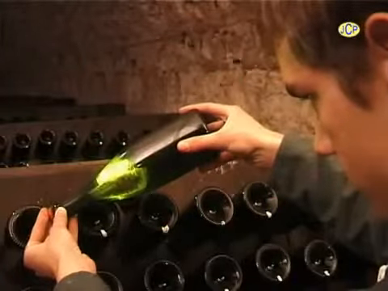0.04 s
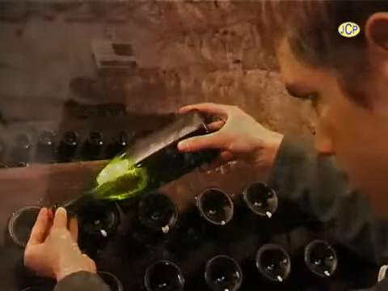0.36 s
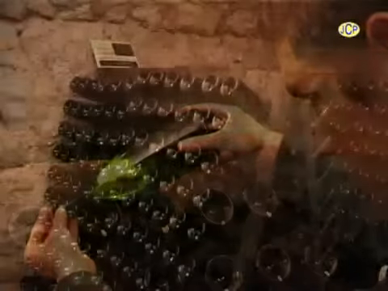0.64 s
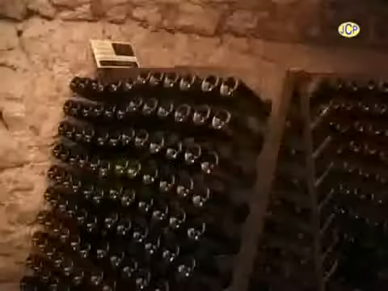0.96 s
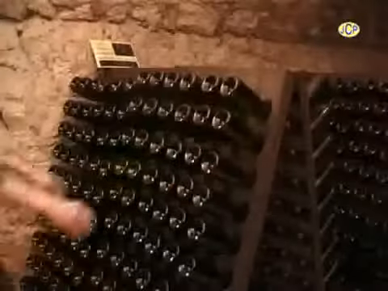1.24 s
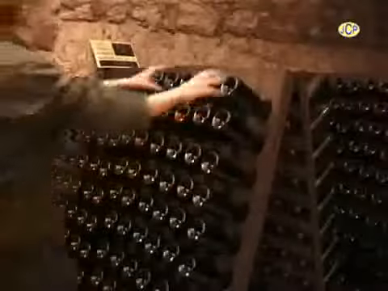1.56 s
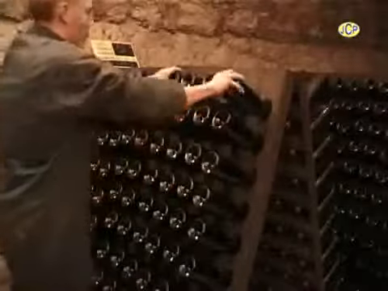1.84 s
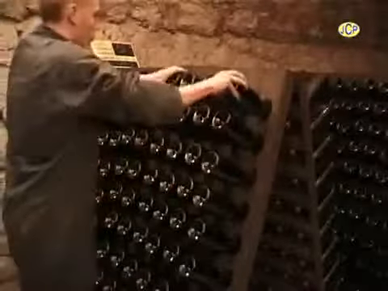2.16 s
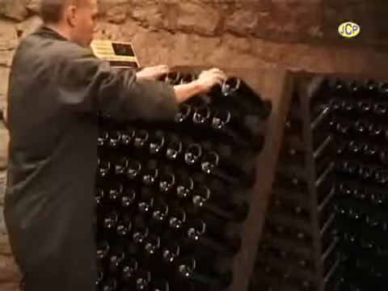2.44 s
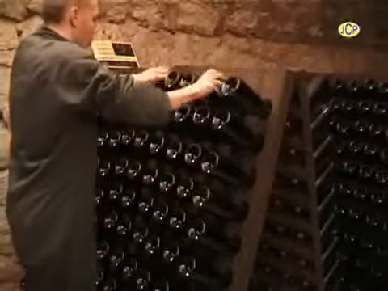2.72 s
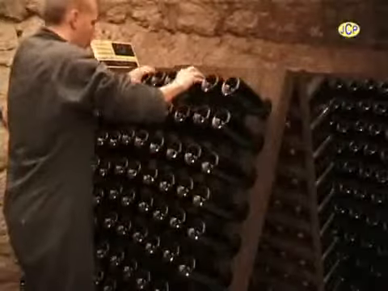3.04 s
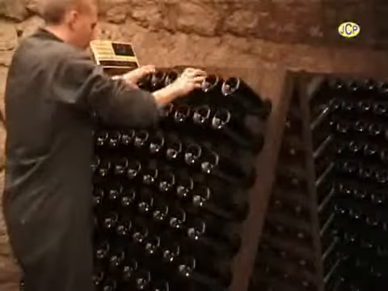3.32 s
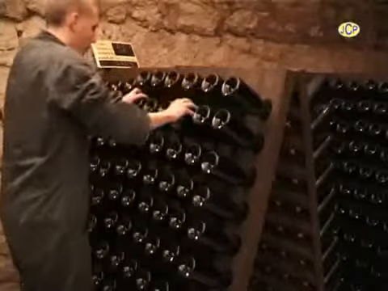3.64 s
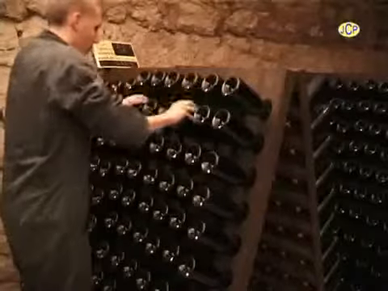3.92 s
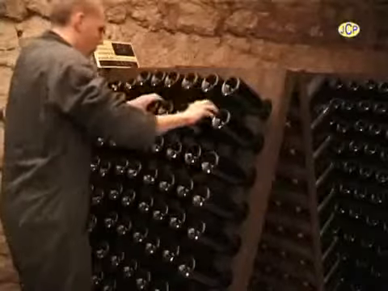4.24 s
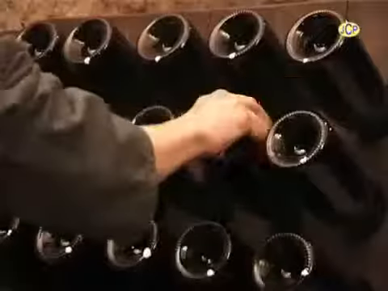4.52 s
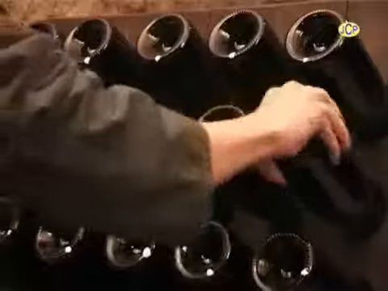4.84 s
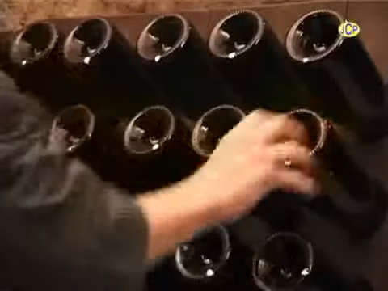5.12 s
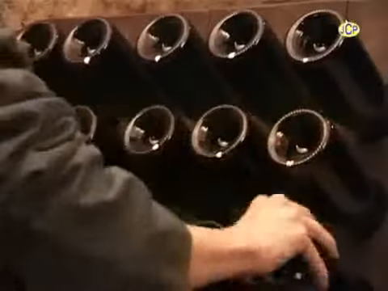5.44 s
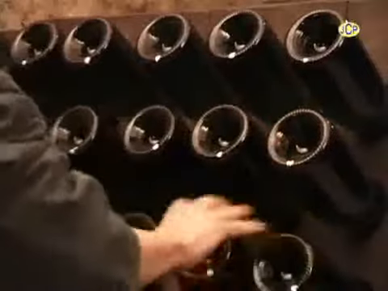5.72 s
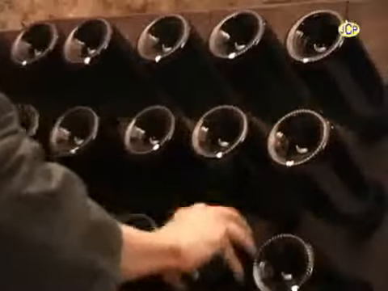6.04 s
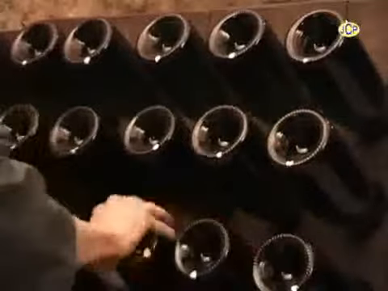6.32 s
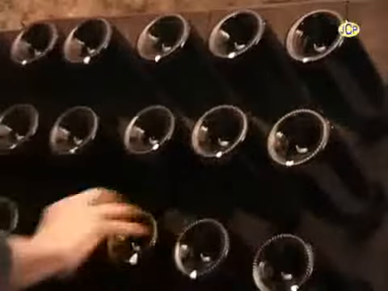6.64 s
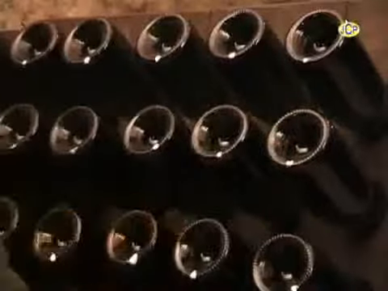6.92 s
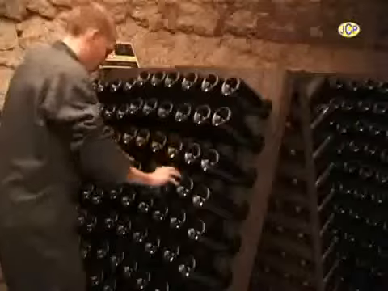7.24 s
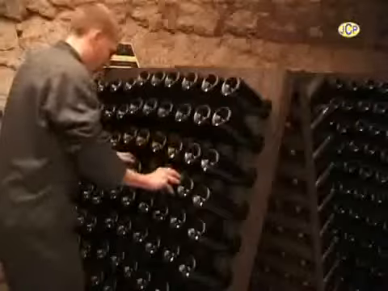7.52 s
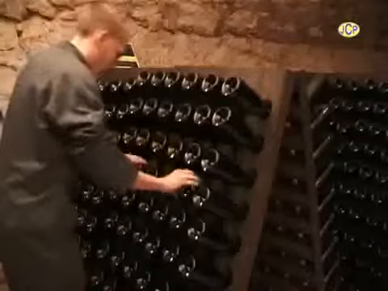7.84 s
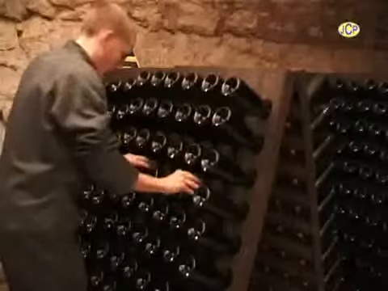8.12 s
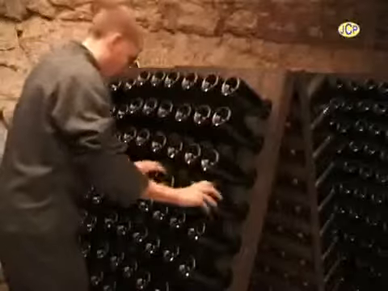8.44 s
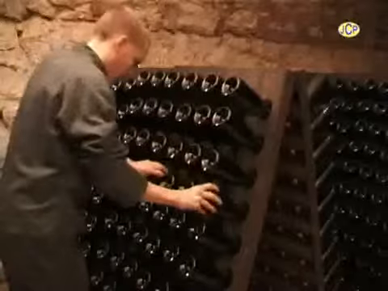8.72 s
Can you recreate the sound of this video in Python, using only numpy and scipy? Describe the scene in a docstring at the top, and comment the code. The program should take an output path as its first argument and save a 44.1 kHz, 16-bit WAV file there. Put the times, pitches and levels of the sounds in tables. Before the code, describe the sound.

It opens very quietly, with faint taps and squeaks of glass on wood over still cellar air. Around 1 second everything dips briefly to near silence. At about 1.5 seconds a coat rustles and light knocks begin, followed by a first modest clack at 2.2 seconds. From 2.8 seconds to the end, near 9 seconds, glass bottles are turned and dropped back into a wooden rack, landing loudly about every 0.6 seconds. Each landing is a quick cluster of touch, blow and rebound: a hollow knock, a wooden clack and a short glassy crack. The strongest come between about 6.4 and 8.2 seconds. Lighter nudges, soft grinding and cloth rustle fill the gaps, with faint high squeaks or rings near 3.6, 5.9 and 7.7 seconds. The impacts sound fairly close, and the stone vault adds a short reverberation with a lingering low boom.

```python
"""Faint squeaks and taps over still cellar air come first, cut by a brief dip to near silence. Then a worker
turns glass bottles, two at a time, in sloping wooden racks. Each bottle is gripped, squeaks or knocks in
its hole, and drops back in a quick cluster of impacts that excite damped modes: a hollow knock, a wooden
clack, a glassy crack. Some ring on briefly. His coat rustles; the stone vault rings and booms."""
import sys
import numpy as np
from scipy import signal
from scipy.fft import rfft, irfft, next_fast_len
from scipy.io import wavfile
from scipy.ndimage import uniform_filter1d

SR = 44100
rng = np.random.default_rng(int(sys.argv[2]) if len(sys.argv) > 2 else 0)


def dump_mix(stems):
    """Bounce the given channels to the path in sys.argv[1] as a 16-bit WAV at rate SR."""
    frames = np.atleast_2d(stems).T  # one column per channel
    limited = np.clip(frames, -1, 1)  # hard clip at full scale
    pcm = np.round(limited * 32767).astype(np.int16)
    wavfile.write(sys.argv[1], SR, pcm)


N = 387198

# Levels in the tables are relative.
# A turned bottle drops home, touching the rim first and rebounding once: (time [s], knock level [dB],
# knock pitch [Hz], clack level [dB], clack pitch [Hz], crack level [dB], touch lead [s], touch level [dB],
# rebound delay [s], rebound knock change [dB], rebound clack and crack change [dB], thump level [dB])
BOTTLE_DROPS = [(2.182, -22, 470, -14, 1180, -52, .005, -38, 0.014, -7, -1.5, -30),
                (2.826, -3.5, 529, -13.5, 880, -20, 0.042, -1, .010, 3, 0.5, -14.5),
                (3.375, -3, 653, -9.5, 1155, -17, .006, -2.5, 0.08, -12, -27, -14),
                (4.014, -4, 493, -6.5, 960, -21.5, 0.027, -3, .015, -3.5, -4.5, -17),
                (4.585, -1, 531, -13.5, 1900, -38, 0.04, -21.5, .044, -8.5, -7, -26),
                (5.151, -1.5, 479, -21.5, 890, -42.5, 0.0052, -19, 0.024, -22, -3.5, -35),
                (5.820, -5.5, 614, -9.5, 1100, -20, 0.019, -5, 0.0097, 0, -13.5, -19),
                (6.396, 1, 537, -6.5, 1250, -21, 0.015, 3.5, .022, -4.5, -13, -26),
                (6.966, 1, 616, -7.5, 990, -17, .037, -4, .030, -15, -13, -20),
                (7.592, -4, 471, -5.5, 1040, -20.5, 0.008, -9.5, .030, -23, 1, -27),
                (8.193, 3, 620, -7, 985, -17, 0.01, -9.5, 0.029, 0, 1, -26.5),
                (8.775, 0, 488, -16.5, 1014, -28, 0.0036, -28, .030, -6, -6, -19)]
# Fingers nudge a bottle against its hole:
# (time [s], knock level [dB], knock pitch [Hz], clack level [dB], clack pitch [Hz], crack level [dB])
BOTTLE_NUDGES = [(0.147, -42, 554, -46.5, 1700, -69), (0.599, -44, 665, -43.5, 920, -69),
                 (0.834, -50, 494, -43.5, 1070, -69), (1.527, -22, 367, -52, 1050, -54),
                 (1.583, -20.5, 364, -41, 1720, -55), (1.984, -45, 500, -33, 1870, -38),
                 (1.999, -21.5, 517, -27, 1920, -42), (2.632, -32, 500, -37, 2190, -59),
                 (2.674, -21.5, 504, -39.5, 1340, -60), (2.752, -11, 546, -30, 980, -57),
                 (2.773, 2, 530, -38, 1120, -54), (2.981, -15, 379, -44, 902, -51),
                 (3.093, -23, 557, -34, 1900, -42), (3.524, -16, 504, -38, 1080, -48),
                 (3.802, -19.5, 585, -28.5, 2200, -41), (3.826, -6.5, 454, -49, 1164, -63),
                 (3.857, -15, 548, -35, 1140, -66), (3.906, -10, 565, -28, 1090, -57),
                 (4.398, -25, 474, -30, 1900, -32.5), (4.413, -6.5, 437, -19.5, 1810, -28.5),
                 (4.709, -17, 495, -38, 1030, -45), (4.981, -16.5, 453, -19.5, 1080, -23.5),
                 (5.023, -11, 457, -25, 930, -60), (5.28, -45, 463, -36, 1990, -46),
                 (5.381, -36, 363, -49, 1920, -40), (5.602, -25.5, 574, -31, 2340, -42),
                 (5.751, -7.5, 519, -36.5, 950, -47), (6.186, -19, 430, -30, 1270, -46),
                 (6.239, -14, 457, -39, 1090, -61), (6.359, -19, 495, -37, 1220, -54),
                 (6.694, -39, 463, -29, 1630, -38), (6.738, -19.5, 532, -28, 1030, -47),
                 (6.84, -12, 529, -50, 1080, -66), (7.418, -16.5, 511, -28.5, 2070, -28),
                 (8.014, -8, 515, -22.5, 1210, -51), (8.511, -35, 410, -30, 1520, -50),
                 (8.629, -19, 516, -25.5, 2480, -39)]
# Glass squeaks or groans on wood, or a bottle rings on briefly:
# (time [s], duration [s], pitch [Hz], half bandwidth [Hz], level [dB])
SQUEAKS_AND_RINGS = [(0.321, 0.097, 272, 100, -50), (0.439, 0.093, 2420, 70, -55),
                     (0.81, 0.1, 2440, 110, -56), (1.507, 0.095, 708, 20, -40.5),
                     (1.595, 0.22, 306, 66, -45.5), (2.47, 0.1, 2700, 83, -53.5),
                     (2.618, 0.11, 2940, 180, -51), (2.988, 0.1, 3400, 280, -46.5),
                     (3.639, 0.036, 3460, 540, -38), (5.934, 0.039, 2680, 120, -39),
                     (5.961, 0.12, 2670, 32, -54.5), (6.803, 0.068, 4720, 21, -54),
                     (6.816, 0.052, 2730, 60, -50), (7.721, 0.17, 2662, 49, -41),
                     (8.008, 0.096, 3000, 27, -49)]
# Normal modes: (frequency [Hz], level [dB], decay time T60 [s])
LOADED_RACK_MODES = [(172.7, -15.5, 0.21), (412, 5.5, 0.13), (550, -14, 0.29), (590, 16.5, 0.014),
                     (746, -25, 0.17), (960, -11, 0.12), (1260, -23, 0.24), (1441, 2.5, 0.085),
                     (1580, 9, 0.046), (1940, 6, 0.026), (1997, 3.5, 0.13)]
FULL_BOTTLE_MODES = [(2740, -1, 0.11), (3620, -40, 0.057), (4590, -4, 0.063), (4695, 20.5, 0.049),
                     (6030, -1, 0.1), (6970, 0, 0.044), (6740, -17, 0.25)]
RACK_FLEXING_MODES = [(172.6, -3.5, 0.15), (313, 0.5, 0.12)]
# Spectra of the impacts and the background noises: (frequency [Hz], spectral density level [dB])
WOOD_SPECTRUM = [(60, -43.5), (170, -13.5), (260, -14.5), (400, 4), (700, 2), (1100, -2.5), (1800, -4),
                 (2600, -13), (4000, -20.5), (8000, -33.5), (13000, -79)]
GLASS_SPECTRUM = [(900, -2.5), (2200, 4), (3300, 2.5), (4800, -2), (6500, -2.5), (8200, -7), (9700, -7.5),
                  (10800, -24.5), (13000, -24)]
RUMBLE_SPECTRUM = [(25, -46), (50, -17), (85, 1), (105, -9), (135, 7.5), (175, 2), (230, -5.5), (320, -2.5),
                   (600, -40.5), (5000, -88)]
GRINDING_SPECTRUM = [(150, -15), (270, -2), (360, 1.5), (440, 4), (560, -3.5), (700, -5.5), (1100, -12.5),
                     (2500, -19.5), (12000, -69)]
COAT_SPECTRUM = [(300, 4.5), (700, 4.5), (1800, 2.5), (3000, -3), (5000, -6), (7500, -11.5), (9800, -17),
                 (11000, -31), (14000, -42)]
AIR_SPECTRUM = [(50, -27), (90, 7.5), (120, -1.5), (400, -3), (900, -3.5), (1020, 4.5), (1150, -5.5),
                (2250, -9.5), (2520, -8), (2850, -13.5), (6500, -18), (10000, -22.5), (12000, -57)]
# Rumble of the rack between drops: (time [s], level [dB])
RUMBLE_ENVELOPE = [(0, -67), (.9, -67), (1.6, -49), (2.25, -48.5), (2.6, -55.5), (3.7, -38.5), (4.3, -41.5),
                   (4.9, -50.5), (6.2, -51), (7.5, -50), (8.1, -51), (8.5, -32.5), (8.78, -40)]
# Coat rustle as the worker steps up, then keeps moving his arms: (time [s], level [dB])
COAT_ENVELOPE = [(0, -72), (1.2, -62.5), (1.42, -50), (1.53, -38.5), (1.8, -42.5), (1.92, -48),
                 (2.06, -43.5), (2.35, -45.5), (2.7, -42.5), (5.5, -49), (6.7, -47.5), (7.4, -47.5),
                 (8.3, -47), (8.78, -35.5)]
# Reverberation time of the vault: (frequency [Hz], decay time T60 [s])
VAULT_DECAY = [(100, 1.76), (260, 0.5), (550, 0.47), (1000, 0.47), (2000, 0.4), (5000, 0.42), (10000, 0.14)]
# Reverberant field of the vault: (frequency [Hz], level [dB])
VAULT_GAIN = [(100, -2.5), (260, -4), (550, -5), (1000, -5), (2000, -4), (5000, -4.5), (10000, -4.5)]

TOUCH_WOOD_DB, TOUCH_GLASS_DB, TOUCH_HZ = -20.5, -34, 541.5   # dull first touch: levels re its knock
REBOUND_PITCH_RATIO = .88   # the seated bottle knocks lower
HARD_RISE_S, SOFTENING_POWER = 0.00064, 0.46   # onset of a 0 dB blow; weaker blows build more slowly
STRETCH_POWER = 0.16   # a light knock is half a rub, so it lasts longer


def bottles():
    """Impact excitation: each contact sets the hollow seat, the wooden board and the glass vibrating."""
    t = np.arange(SR // 6) / SR
    tones, clacks, cracks = np.zeros((3, N))
    for s, knock_db, knock_hz, wood_db, wood_hz, glass_db in contacts():
        onset = 1 - np.exp(-t / (HARD_RISE_S * amp(-SOFTENING_POWER * wood_db)))
        wood = onset * amp(wood_db + 28.5)   # the offsets turn a level into the energy of one blow
        glass = onset * amp(glass_db + 29.5)
        stretch = amp(-STRETCH_POWER * wood_db)
        hollow = knock(t, knock_hz, t60=0.055 * stretch, rise_s=0.0025 * stretch, rattle_db=-2)
        add(tones, s, onset * amp(knock_db + 3) / np.sqrt(stretch) * hollow)
        # the place struck favours one pitch
        add(tones, s, wood * amp(-7.5) * clatter(t, wood_hz, t60=0.071, width=0.17))
        add(tones, s, wood * amp(-9) * ringing(t, LOADED_RACK_MODES, detune=0.0052))
        add(tones, s, glass * amp(-10) * ringing(t, FULL_BOTTLE_MODES, detune=0.021))
        # wood gives a slow crash, glass a hard short one
        add(clacks, s, wood * impact(t, rise_s=.018, crash_t60=.06, chatter_db=-12, snap_db=-12))
        add(cracks, s, glass * impact(t, rise_s=.008, crash_t60=.03, chatter_db=-17, snap_db=-5))
    return tones + colour_same_power(clacks, WOOD_SPECTRUM) + colour_same_power(cracks, GLASS_SPECTRUM)


def contacts():
    """Collision and rebound: a nudge is one contact; a drop is a touch, a blow and a bounce."""
    rows = list(BOTTLE_NUDGES)
    for drop in BOTTLE_DROPS:
        s, knock_db, knock_hz, wood_db, wood_hz, glass_db = drop[:6]
        lead_s, touch_db, delay_s, knock_change_db, clack_change_db = drop[6:11]
        touch = (s - lead_s, touch_db, TOUCH_HZ,
                 touch_db + TOUCH_WOOD_DB, wood_hz, touch_db + TOUCH_GLASS_DB)
        blow = (s, knock_db, knock_hz, wood_db, wood_hz, glass_db)
        rebound = (s + delay_s, knock_db + knock_change_db, knock_hz * REBOUND_PITCH_RATIO,
                   wood_db + clack_change_db, wood_hz, glass_db + clack_change_db)
        rows += [touch, blow, rebound]
    return rows


def knock(t, hz, t60, rise_s, rattle_db):
    """Damped oscillation: the bottle's mass bounces on the board; neighbours rattle near its pitch."""
    bounce = np.sin(2 * np.pi * hz * t) * decay(t, t60) * (1 - np.exp(-t / rise_s))
    rattle = clatter(t, hz, t60=.14, width=.24)
    return bounce + amp(rattle_db) * np.linalg.norm(bounce) * rattle


def clatter(t, hz, t60, width):
    """Modal overlap: close resonances around one pitch merge into a decaying band of noise."""
    burst = rng.standard_normal(len(t)) * decay(t, t60)
    return unit_energy(band(burst, hz / (1 + width), hz * (1 + width)))


def ringing(t, modes, detune):
    """Modal superposition: each bottle and seat is tuned differently; each blow excites modes unevenly."""
    hz, db, t60 = np.transpose(modes)
    level_scatter, pitch_scatter, polarity = rng.standard_normal((3, len(hz)))
    strength = amp(db + 3 * level_scatter) * np.sign(polarity)
    tuned_hz = hz * (1 + detune * pitch_scatter)
    waves = np.sin(2 * np.pi * tuned_hz[:, None] * t) * decay(t, t60[:, None])
    return unit_energy(strength @ waves)


def impact(t, rise_s, crash_t60, chatter_db, snap_db):
    """Broadband transient: a snap, a crash of tiny collisions, then weaker chatter through the rack."""
    snap = amp(snap_db) * decay(t, t60=.006)
    chatter = amp(chatter_db) * decay(t, t60=.2)
    crash = (1 - decay(t, rise_s)) * (decay(t, crash_t60) + chatter)
    return unit_energy(rng.standard_normal(len(t)) * (crash + snap))


def slides(re_touch_db):
    """Sliding friction: glass scrapes on wood from the first touch until the bottle lands."""
    pressure = np.zeros(N)
    for s, _, _, _, _, _, lead_s, touch_db, *_ in BOTTLE_DROPS:
        size = max(int(lead_s * SR), 1)
        add(pressure, s - lead_s, np.full(size, amp(touch_db + re_touch_db)))
    return uniform_filter1d(pressure, size=256) * noise(WOOD_SPECTRUM, flutter_db=4, flutter_hz=260)


def thumps():
    """Free vibration: the whole rack gives under each landing bottle and sounds its lowest modes."""
    t, out = np.arange(SR // 3) / SR, np.zeros(N)
    for s, *_, thump_db in BOTTLE_DROPS:
        for hz, db, t60 in RACK_FLEXING_MODES:
            mode = clatter(t, hz, t60, width=.16)
            add(out, s, amp(thump_db + db) * mode / np.abs(mode).max())
    return out


def squeaks_and_rings(rasp_db, rasp_width):
    """Resonance: a narrow band sings inside a broader rasp as glass rubs on wood or a bottle rings on."""
    out = np.zeros(N)
    for s, duration_s, hz, half_width_hz, db in SQUEAKS_AND_RINGS:
        size = int(duration_s * SR)
        drive = rng.standard_normal(SR // 3)
        tone = unit_energy(band(drive, hz - half_width_hz, hz + half_width_hz)[-size:])
        rasp = unit_energy(band(drive, hz / (1 + rasp_width), hz * (1 + rasp_width))[-size:])
        note = (tone + amp(rasp_db) * rasp) * signal.windows.tukey(size)
        add(out, s, amp(db) * np.sqrt(size) * unit_energy(note))
    return out


def vault(x, build_s):
    """Reverberation: reflections from stone form a dense tail that lasts longest in the bass."""
    t = np.arange(3 * SR // 2) / SR
    edges_hz = np.geomspace(50, 14000, num=15)
    build_up = 1 - np.exp(-t / build_s)
    response = 0
    for low, high in zip(edges_hz, edges_hz[1:]):
        hz = np.sqrt(low * high)
        tail = band(rng.standard_normal(len(t)), low, high) * decay(t, at_hz(VAULT_DECAY, hz)) * build_up
        band_share = 2 * (high - low) / SR
        response += amp(at_hz(VAULT_GAIN, hz)) * np.sqrt(band_share) * unit_energy(tail)
    return signal.fftconvolve(x, response)[:N]


def rack_rumble():
    """Structure-borne sound: the rack rumbles, and shudders after each drop; the two add in power."""
    shudder = amp(-31) * after_drops(rise_s=.004, t60=0.55)
    envelope = np.hypot(gain_curve(RUMBLE_ENVELOPE), shudder)
    return envelope * noise(RUMBLE_SPECTRUM, flutter_db=2.5, flutter_hz=42)


def grinding(start_s, ramp_s):
    """Friction noise: handled bottles grind hollowly in their holes, and grind to rest after a drop."""
    handling = amp(-44) * np.clip((np.arange(N) / SR - start_s) / ramp_s, 0, 1)
    settling = amp(-25) * after_drops(rise_s=0.071, t60=0.88)
    return np.hypot(handling, settling) * noise(GRINDING_SPECTRUM, flutter_db=3.5, flutter_hz=45)


def coat_rustle():
    """Friction of cloth: broadband noise that follows the worker's movements."""
    return amp(-1.5) * gain_curve(COAT_ENVELOPE) * noise(COAT_SPECTRUM, flutter_db=1, flutter_hz=120)


def cellar_air():
    """Ambient noise: the air of the cellar sets a nearly steady floor."""
    return amp(-53.5) * noise(AIR_SPECTRUM, flutter_db=1.2, flutter_hz=12)


def level_dip(from_s, to_s, fall_s, rise_s):
    """Amplitude envelope: the whole sound sinks, is almost silent for a moment and returns."""
    t = np.arange(N) / SR
    presence = np.maximum((from_s - t) / fall_s, (t - to_s) / rise_s)
    gate = uniform_filter1d((presence > 0) * 1.0, size=512)
    fade_db = -13.5 * (1 - np.clip(presence, 0, 1))
    return np.maximum(gate, amp(-30)) * amp(fade_db)


def after_drops(rise_s, t60):
    """Linear response: an envelope swells and decays after each drop, in proportion to its knock."""
    t, envelope = np.arange(2 * SR) / SR, np.zeros(N)
    for s, knock_db, *_ in BOTTLE_DROPS:
        add(envelope, s, amp(knock_db) * (1 - np.exp(-t / rise_s)) * decay(t, t60))
    return envelope


def noise(spectrum, flutter_db, flutter_hz):
    """Random amplitude modulation: coloured noise of rms 1 whose level flutters."""
    steps = np.arange(N) / SR * flutter_hz
    white = rng.standard_normal(N)
    flutter = np.interp(steps, np.arange(4096), rng.standard_normal(4096))
    return np.sqrt(N) * unit_energy(colour(white * amp(flutter_db * flutter), spectrum))


def colour(x, spectrum):
    """Minimum-phase filtering: folding the cepstrum gives a causal filter with this spectrum."""
    size = 2 * next_fast_len(len(x))
    hz = np.arange(size // 2 + 1) * SR / size
    cepstrum = irfft(np.log(amp(at_hz(spectrum, hz))))
    cepstrum[1:size // 2] *= 2
    cepstrum[size // 2 + 1:] = 0
    return irfft(rfft(x, size) * np.exp(rfft(cepstrum)))[:len(x)]


def colour_same_power(x, spectrum):
    """Spectral shaping that conserves the power of a white signal."""
    gain = amp(at_hz(spectrum, np.linspace(0, SR / 2, num=4096)))
    return colour(x, spectrum) / np.sqrt(np.mean(gain ** 2))


def band(x, low_hz, high_hz):
    """Band-pass filtering with second-order skirts."""
    return signal.sosfilt(signal.butter(2, [low_hz, high_hz], "band", fs=SR, output="sos"), x)


def decay(t, t60):
    """Exponential damping: 60 dB in t60 seconds."""
    return np.exp(-np.log(1000) * t / t60)


def amp(db):
    """Decibels to amplitude ratio."""
    return 10 ** (np.asarray(db) / 20)


def unit_energy(x):
    """Energy normalisation: the squares sum to one."""
    return x / np.sqrt(np.sum(x ** 2) + 1e-20)


def gain_curve(envelope):
    """Interpolation in decibels gives a gain for every sample."""
    s, db = np.transpose(envelope)
    return amp(np.interp(np.arange(N) / SR, s, db))


def at_hz(points, hz):
    """Interpolation on a log-frequency axis."""
    f, value = np.transpose(points)
    return np.interp(np.log(np.maximum(hz, 1)), np.log(f), value)


def add(track, s, sound):
    """Superposition: mix a sound into the track at time s."""
    i = int(np.clip(round(s * SR), 0, N))
    track[i:i + len(sound)] += sound[:N - i]


def scene():
    """Superposition of the bottles' direct sound, their reverberant field and the background."""
    direct = bottles() + slides(re_touch_db=-15.5) + thumps()
    direct += squeaks_and_rings(rasp_db=-7, rasp_width=0.18)
    reverberant = vault(direct, build_s=0.0024)
    background = rack_rumble() + grinding(start_s=0.96, ramp_s=2.8) + cellar_air() + coat_rustle()
    dip = level_dip(from_s=.986, to_s=1.074, fall_s=0.27, rise_s=0.2)
    return (amp(-1.5) * dip * (direct + reverberant + background))[None]


def record(dry, asymmetry=0.075, cutoff_hz=13700):
    """Saturation: the loudest clacks overload, more in one polarity; a low-pass cuts the top."""
    clipped = dry / (1 + (dry / .95) ** 4) ** (1 / 4)
    bent = clipped - asymmetry * clipped ** 2
    return signal.sosfilt(signal.cheby1(10, .3, cutoff_hz, fs=SR, output="sos"), bent)


dry = scene()
out = record(dry)
dump_mix(out)
```